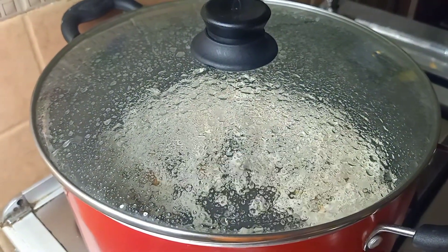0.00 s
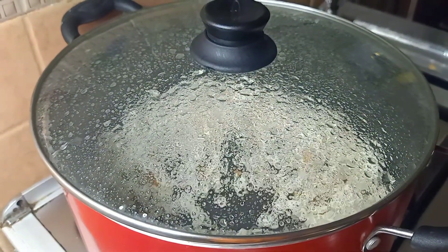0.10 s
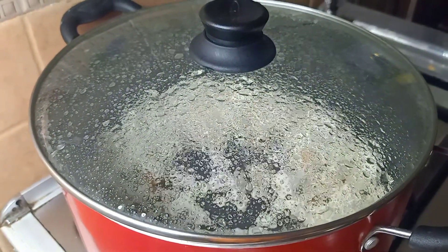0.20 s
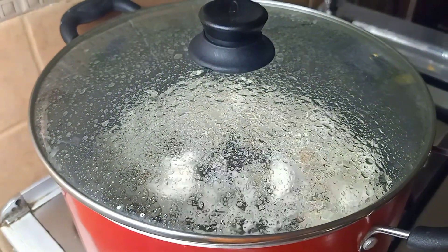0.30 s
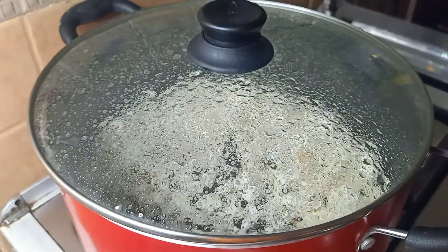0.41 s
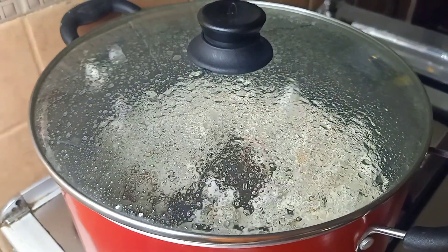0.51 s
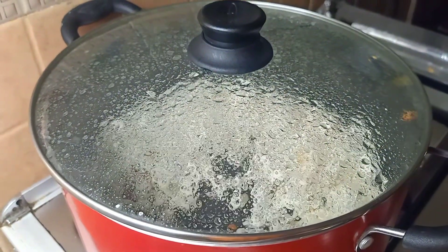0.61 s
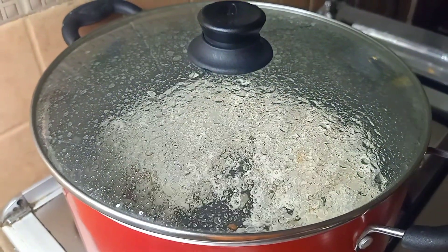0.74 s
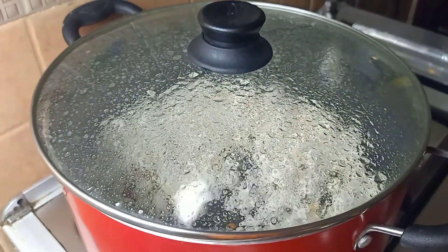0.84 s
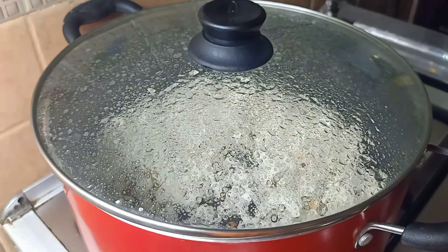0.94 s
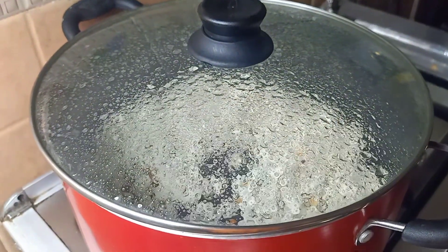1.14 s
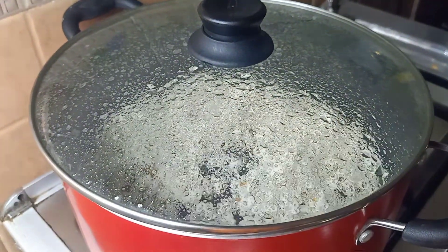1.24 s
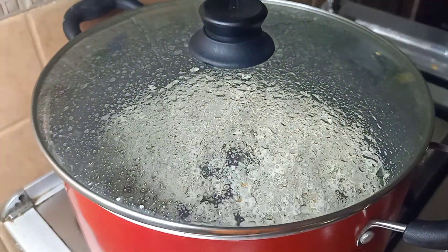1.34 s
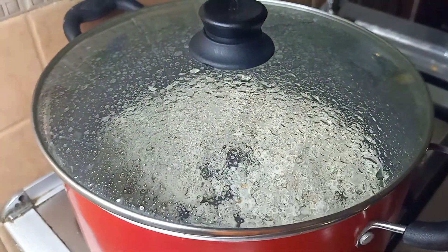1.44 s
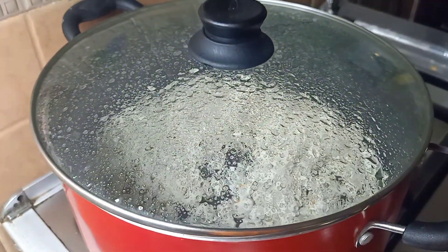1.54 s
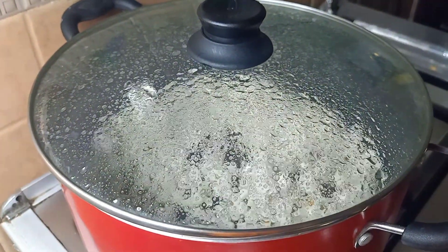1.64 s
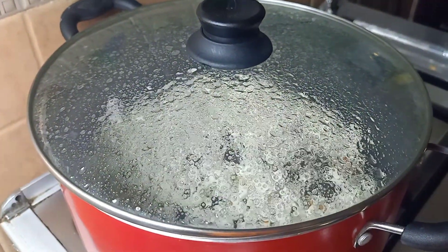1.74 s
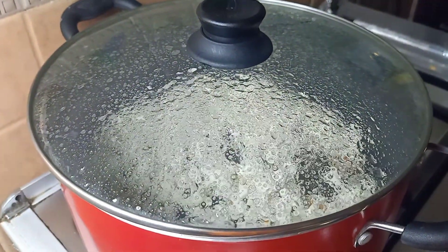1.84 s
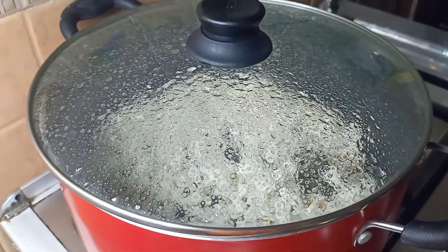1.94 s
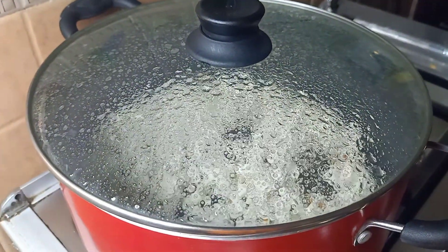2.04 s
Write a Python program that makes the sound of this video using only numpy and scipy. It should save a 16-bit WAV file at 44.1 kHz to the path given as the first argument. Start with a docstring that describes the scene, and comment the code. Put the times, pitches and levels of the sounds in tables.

```python
"""Popcorn in a lidded pot

Popcorn pops in a steel pot under a glass lid, close by, in a small kitchen. Each hull bursts as crackling
noise, thumps the modes of the air in the pot and rings its wall; some split in one dry click.
Kernels knock on the lid as decaying modes, the heap bumps as short low sines and oil spits band-passed noise.
A diffuse tail answers the pops and snaps, over filtered noise for faint sizzling and the burner's murmur."""
import sys
import numpy as np
from scipy import signal
from scipy.fft import rfft, irfft, next_fast_len
from scipy.io import wavfile
from scipy.ndimage import uniform_filter1d

SR = 44100
rng = np.random.default_rng(int(sys.argv[2]) if len(sys.argv) > 2 else 0)


def unload_audio(sound):
    """Save the sound as a 16-bit wav file, at the path given as the first command line argument."""
    columns = np.transpose(np.atleast_2d(sound))
    # keep every value between -1 and 1, then stretch to whole-number steps
    steps = np.round(np.clip(columns, -1, 1) * 32767)
    wavfile.write(sys.argv[1], SR, steps.astype(np.int16))


N = 90405
SIZE = 8192  # samples computed for each short event
T = np.arange(SIZE) / SR
RELEASE_S = 0.0026


def undb(db):
    """Decibels are logarithmic: 20 dB is a tenfold amplitude gain."""
    return 10 ** (np.asarray(db) / 20)


def unit(x):
    """Normalisation: scale to rms 1."""
    return x / np.sqrt(np.mean(x ** 2))


def match(x, env):
    """Energy matching: give a sound the rms of an envelope."""
    return unit(x) * np.sqrt(np.mean(env ** 2))


def pan(db):
    """Constant-power panning: left and right gains for a level difference in dB."""
    return unit(undb(np.array([[db], [-db]]) / 2))


def add(out, start, x):
    """Superposition: mix a sound in at a time in seconds."""
    i = max(int(start * SR), 0)
    out[:, i:i + x.shape[-1]] += x[..., :N - i]


def highpass(x, order, hz):
    """Butterworth high-pass: attenuate what lies below the cutoff."""
    return signal.sosfilt(signal.butter(order, hz, "high", fs=SR, output="sos"), x)


def band(x, lo_hz, hi_hz):
    """Butterworth band-pass: keep what lies between two cutoffs."""
    return signal.sosfilt(signal.butter(4, [lo_hz, hi_hz], "band", fs=SR, output="sos"), x)


def colour(x, points):
    """Minimum-phase filtering: a folded cepstrum makes a causal filter that follows (Hz, dB) points."""
    size = 2 * next_fast_len(x.shape[-1])
    hz, db = np.array(points, float).T
    bin_hz = np.arange(size // 2 + 1) * SR / size
    curve_db = np.interp(np.log(bin_hz + 1), np.log(hz), db)
    cepstrum = irfft(np.log(undb(curve_db)))[:size // 2]
    cepstrum[1:] *= 2
    response = np.exp(rfft(cepstrum, size))
    return irfft(rfft(x, size) * response)[..., :x.shape[-1]]


def diffuse(size):
    """Diffuse field: stereo noise that the two ears share in the bass and hear apart in the treble."""
    mid, side = rng.standard_normal((2, size))
    side = highpass(side, 1, 1180)
    return np.array([mid + side, mid - side]) / np.sqrt(2)


def burst(attack, length, sag_db, release):
    """Transient envelope: a linear rise, a hold that sags in dB, an exponential release."""
    rise = np.minimum(T / attack, 1)
    sag = undb(-abs(sag_db) * np.minimum(T / length, 1))
    return rise * sag * np.exp(-np.maximum(T - length, 0) / release)


def ring(hz):
    """Modal vibration: one sine, met at a different random phase by each ear."""
    return np.sin(2 * np.pi * (hz * T + rng.random((2, 1))))


def pops():
    """Sudden release of steam: each burst drives hull, air and wall; also returns what excites the room."""
    # Each row: start, attack and length in seconds, sag over the length in dB (sign ignored), then levels
    # in dB of thump (before its own trims), body, crack, hiss and wall ring, and room send in dB.
    pop_rows = [ (0.028, 0.0041, 0.054, 11.5, -45.5, -51.5, -49.5, -53.5, -52.5, -11.5),
                (0.205, 0.0026, 0.041, 5.5, -37, -47.5, -39, -51, -62, -11),
                (0.385, 0.014, 0.039, 7.5, -47, -55.5, -40.5, -59, -68, -9.5),
                (0.513, 0.0068, 0.051, 15, -43, -49, -42.5, -49, -66, -8),
                (0.603, 0.0022, 0.053, 8.5, -50.5, -60.5, -57, -68, -59, -3),
                (0.647, 0.0044, 0.013, 2.5, -41.5, -35, -33, -40.5, -60.5, -22),
                (0.662, 0.0048, .029, 15, -31.5, -35.5, -24.5, -34.5, -29.5, -22),
                (0.700, 0.014, 0.035, 2, -54, -57, -52, -62.5, -60, -27),
                (0.8961, 0.0012, 0.016, 17.5, -30, -38.5, -28, -34.5, -33, -16),
                (0.954, 0.0027, 0.052, 6.5, -48.5, -58, -61.5, -62, -60.5, -15.5),
                (1.0992, 0.0026, 0.0053, 4, -22.5, -36.5, -26.5, -25.5, -22, -25),
                (1.107, 0.0015, 0.026, 8.5, -40.5, -49, -36.5, -37.5, -27, -27),
                (1.139, 0.012, 0.037, 4, -58, -82, -56.5, -63.5, -58, -8.5),
                (1.221, 0.0034, 0.04, 12.5, -40, -49, -42, -49, -46.5, -11),
                (1.275, .004, 0.039, 5, -57.5, -68, -57, -77, -67, -43),
                (1.32, .005, 0.031, 12, -60, -59, -100, -75, -88, -31),
                (1.726, 0.0027, 0.025, -3, -54, -67, -46, -69, -60, -1.5),
                (1.752, 0.001, 0.044, 9, -34.5, -46, -37, -44.5, -45, -23),
                (1.803, 0.0024, 0.049, 17.5, -53, -55, -52, -59, -53.5, -33), ]
    wall_room_db = 3  # extra room send of the wall
    direct, send = np.zeros((2, 2, N))
    for start, attack, length, sag_db, thump_db, body_db, crack_db, hiss_db, wall_db, room_db in pop_rows:
        env = burst(attack, length, sag_db, RELEASE_S)
        puff = hull(env, (body_db, crack_db, hiss_db))
        puff = puff + undb(thump_db) * thump(attack, length, sag_db)
        ringing = undb(wall_db) * wall(env)
        add(direct, start, puff + ringing)
        add(send, start, undb(room_db) * (puff + undb(wall_room_db) * ringing))
    return direct, send


def hull(env, levels_db):
    """Fracture noise: dense cracks, partly shared by the ears, scattered around the pot."""
    # Spectrum of the tearing hull. Each row: frequency in Hz, relative level in dB.
    hull_spectrum = [(350, -11.5), (550, 5), (760, -1), (1050, 5), (1450, -7.5), (2000, 4), (2700, 2.5),
                     (3300, -5.5), (4200, -10.5), (5500, -13), (7200, -6), (9500, -16.5), (12000, -21.5),
                     (15000, -30), (16500, -72)]
    # Bands of body, crack and hiss. Each row: low edge in Hz, high edge in Hz, left minus right in dB.
    hull_bands = [(707, 1500, 1), (1505, 4200, -4.5), (4130, 17000, 0)]
    grain_db, apart_db = 4.5, 0.5  # spread of crack levels; level of each ear's own cracks
    scatter_s, scatter_db = 0.0039, -19.5  # decay time constant and starting level of the echoes
    ear_lag_s = 0.00018  # mean lag of the left ear

    grains = undb(grain_db * rng.standard_normal((3, SIZE)))
    cracks = rng.standard_normal((3, SIZE)) * grains * env
    cracks = cracks[0] + undb(apart_db) * cracks[1:]
    paths = rng.standard_normal((2, SIZE)) * np.exp(-T / scatter_s) * undb(scatter_db)
    paths[:, 0] += 1  # direct path
    x = signal.fftconvolve(cracks, paths, axes=1)[:, :SIZE]
    x[0] = np.roll(x[0], int(ear_lag_s * SR * rng.uniform(0, 2)))
    x = colour(x, hull_spectrum)
    out = np.zeros((2, SIZE))
    for (lo_hz, hi_hz, side_db), level_db in zip(hull_bands, levels_db):
        out += match(band(x, lo_hz, hi_hz), env) * undb(level_db) * pan(side_db)
    return out


def thump(attack, length, sag_db):
    """Cavity resonance: the puff of steam rings the air in the pot; a longer puff churns it more."""
    # Modes of the air in the pot. Each row: frequency in Hz, relative level in dB, 60 dB decay in seconds
    # (before the puff's envelope cuts the ringing short).
    air_modes = [(189.1, 0.5, 0.14), (237, -5.5, 0.069), (368.3, -17.5, 0.24)]
    # Spectrum of the churning air. Each row: frequency in Hz, relative level in dB.
    churn_spectrum = [(25, -26.5), (60, -14), (110, -11), (190, 0), (260, -1.5), (390, -9.5), (540, -10),
                      (800, -22.5), (2000, -64)]
    rise_s, release_s = 0.0028, 0.0012
    air_db, churn_db, churn_db_per_s = -3.5, -7.5, 117  # churn level at zero length, and its growth

    env = burst(attack, length, sag_db, release_s)
    air = sum(undb(db - 60 * T / t60) * np.sin(2 * np.pi * hz * T) for hz, db, t60 in air_modes)
    air = match(air * burst(rise_s, length, 0, release_s), env)
    churn = match(colour(diffuse(SIZE) * env, churn_spectrum), env)
    x = undb(air_db) * air + undb(churn_db + churn_db_per_s * length) * churn
    return highpass(x, 2, 62)


def wall(env):
    """Forced vibration: wall modes sound while the burst drives them, in a new balance each time."""
    # Modes of the pot wall. Each row: frequency in Hz, mean relative level in dB.
    wall_modes = [(1038, -8.5), (1110, -14), (1681, -0.5), (1991, -4), (2230, -6.5), (2410, -8),
                  (2524, -5.5), (2747, -0.5), (3205, -6), (3975, -12), (4615, -12), (6990, -24)]
    scatter_db, pan_db = 2.0, -9.5  # random spread of mode levels; left minus right
    modes = sum(undb(db + scatter_db * rng.standard_normal()) * ring(hz) for hz, db in wall_modes)
    return unit(modes) * env * pan(pan_db)


def snaps():
    """Impulsive fracture: hulls split at once, a click inside brief tearing noise, with a thump."""
    # Each row: start and length in seconds, levels in dB of thump (before its own trims), snap and hiss,
    # room send in dB.
    snap_rows = [ (0.3816, 0.0033, -34, -31, -40.5, -10), (0.4613, 0.0075, -58, -43.5, -63, -18),
                 (1.6594, 0.0039, -41.5, -42.5, -71, -19), (1.663, 0.0029, -33, -30, -47, -6.5),
                 (1.7016, 0.0062, -27.5, -34.5, -41, -13), ]
    # Spectrum of click and tearing. Each row: frequency in Hz, relative level in dB.
    snap_spectrum = [(350, -7.5), (660, -6.5), (1100, 8), (1500, 3.5), (1950, 2), (2800, -3), (3150, -14),
                     (3600, -11.5), (4500, -21), (5300, -28.5), (7300, -19.5), (11000, -34.5), (16000, -45)]
    delay_s = 0.000914  # rise of the tearing, and the click at its end
    sag_db, thump_sag_db, tear_db = 3, 7.5, 4.5
    split_hz, pan_db = 4420, -4  # snap below, hiss above; snap's left minus right

    direct, send = np.zeros((2, 2, N))
    for start, length, thump_db, snap_db, hiss_db, room_db in snap_rows:
        env = burst(delay_s, length, sag_db, RELEASE_S / 2)
        impulse = np.zeros(SIZE)
        impulse[int(delay_s * SR)] = 1
        tearing = undb(tear_db) * rng.standard_normal((2, SIZE)) * env
        x = colour(match(impulse, env) + tearing, snap_spectrum)
        snap = undb(snap_db) * match(band(x, 405, split_hz), env) * pan(pan_db)
        hiss = undb(hiss_db) * match(band(x, split_hz, 18000), env)
        x = snap + hiss + undb(thump_db) * thump(delay_s, length, thump_sag_db)
        add(direct, start, x)
        add(send, start, undb(room_db) * x)
    return direct, send


def lid():
    """Struck plate: flung kernels ring the glass briefly, each spot favouring other modes."""
    # Modes of the lid. Each row: frequency in Hz, relative level in dB.
    lid_modes = [(1147, -1), (1350, -4.5), (2172, 8.5), (2431, 4.5), (2612, 7.5), (2872, -3.5), (3071, -5),
                 (3274, -12), (3950, -5)]
    # Each row: start and contact in seconds, level in dB (before doubling), centre of favoured modes in Hz.
    knocks = [(0.235, 0.0013, -41.5, 2220), (0.401, 0.0023, -44, 2089), (0.5226, 0.0012, -31.5, 2650),
              (0.647, .003, -35.5, 1330), (0.655, .004, -21, 2790), (0.666, 0.0076, -25, 3370),
              (0.674, 0.0025, -29, 2210), (0.938, .002, -48, 2930), (1.223, .002, -37.5, 2370),
              (1.2553, 0.0022, -36, 2540), (1.2605, 0.0033, -40, 2890), (1.735, 0.0069, -38, 2960)]
    spot_octaves, t60_s, pan_db = 0.16, 0.05, -13.5  # half width of a spot's favour; decay; left minus right
    out = np.zeros((2, N))
    hz, db = np.array(lid_modes).T
    for start, contact, level_db, spot_hz in knocks:
        gains = undb(db) / (1 + (np.log2(hz / spot_hz) / spot_octaves) ** 2)
        gains = gains / np.linalg.norm(gains)
        modes = sum(gain * ring(f) for gain, f in zip(gains, hz))
        env = np.minimum(T / contact, 1) * undb(-60 * T / t60_s)
        add(out, start, 2 * undb(level_db) * modes * env * pan(pan_db))
    return out


def heap():
    """Damped oscillation: soft low bumps as the popcorn settles."""
    # Each row: start in seconds, pitch in Hz, level in dB (before doubling).
    bumps = [(0.106, 406, -47), (0.236, 390, -36), (1.034, 363, -58), (1.446, 120, -57.5),
             (1.464, 151.7, -59)]
    rise_s, decay_s = 0.0056, 0.0062
    env = np.minimum(T / rise_s, 1) * np.exp(-T / decay_s)
    out = np.zeros((2, N))
    for start, hz, db in bumps:
        add(out, start, 2 * undb(db) * np.sin(2 * np.pi * hz * T) * env)
    return out


def oil():
    """Decaying broadband noise: tiny bright spits of hot oil."""
    # Each row: start in seconds, level in dB (before doubling).
    spits = [(0.156, -74), (0.724, -97), (0.822, -75), (1.083, -71.5), (1.328, -77), (1.34, -78),
             (1.37, -70.5), (1.381, -78), (1.418, -73.5)]
    decay_s = 0.012
    out = np.zeros((2, N))
    for start, db in spits:
        noise = unit(band(diffuse(SIZE), 2700, 11200))
        add(out, start, 2 * undb(db) * noise * np.exp(-T / decay_s))
    return out


def kitchen(send):
    """Reverberation: convolution with a short diffuse tail whose treble dies first."""
    # Spectrum of the tail. Each row: frequency in Hz, relative level in dB.
    room_spectrum = [(40, -32.5), (120, 7), (200, -12.5), (400, 8), (1000, -3), (2500, -7.5), (6000, -3.5),
                     (15000, -5)]
    t60_s, treble_t60_s, build_s, level_db = 0.4, 0.15, 0.028, 0.5
    t = np.arange(SR // 2) / SR
    noise = diffuse(len(t))
    low = signal.sosfilt(signal.butter(1, 3000, fs=SR, output="sos"), noise)
    tail = low * undb(-60 * t / t60_s) + (noise - low) * undb(-60 * t / treble_t60_s)
    tail = tail * np.minimum(t / build_s, 1)
    tail = colour(unit(tail) / np.sqrt(len(t)), room_spectrum)
    return undb(level_db) * signal.fftconvolve(send, tail, axes=1)[:, :N]


def stove():
    """Stationary noise, slowly modulated: the burner's low murmur and a faint sizzle waver together."""
    # Spectrum of murmur and sizzle. Each row: frequency in Hz, relative level in dB.
    burner_spectrum = [(20, 5), (45, -48.5), (80, -3), (112, 5), (160, 1), (300, -9), (700, -12.5),
                       (1500, -17), (2400, -10.5), (4000, -26), (7500, -25), (12000, -35), (16000, -39)]
    level_db, waver_db = -68.5, 1.5  # waver is rms
    waver = uniform_filter1d(rng.standard_normal(N), size=1500)
    waver = unit(uniform_filter1d(waver, size=1500))
    return undb(level_db) * unit(colour(diffuse(N), burner_spectrum)) * undb(waver_db * waver)


def scene():
    """Superposition: the pot on the stove, with the room's answer to pops and snaps."""
    direct, send = np.add(pops(), snaps())
    return direct + kitchen(send) + lid() + heap() + oil() + stove()


def record(dry):
    """Band limiting: a steep elliptic low-pass cuts the top."""
    top_hz = 15600
    return signal.sosfilt(signal.ellip(8, 0.2, 70, top_hz, fs=SR, output="sos"), dry)


dry = scene()
out = record(dry)
unload_audio(out)
```